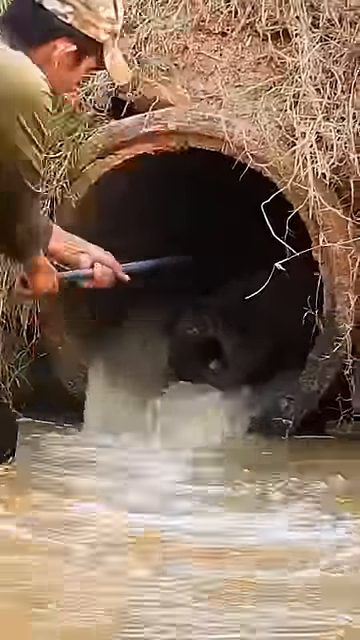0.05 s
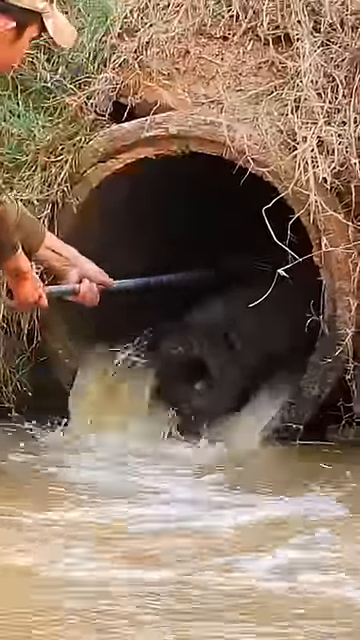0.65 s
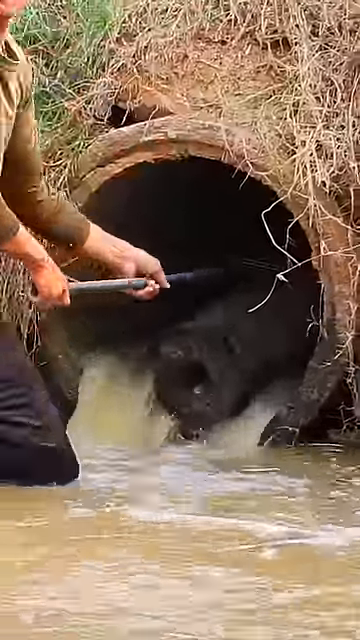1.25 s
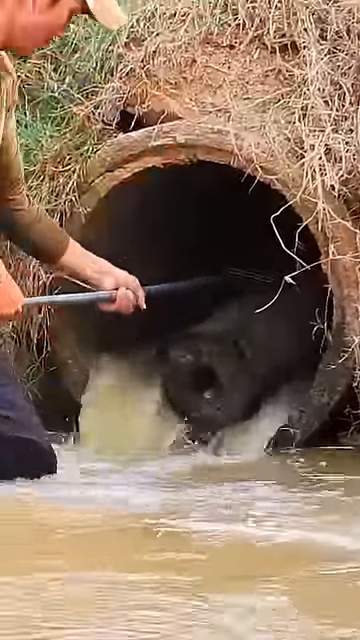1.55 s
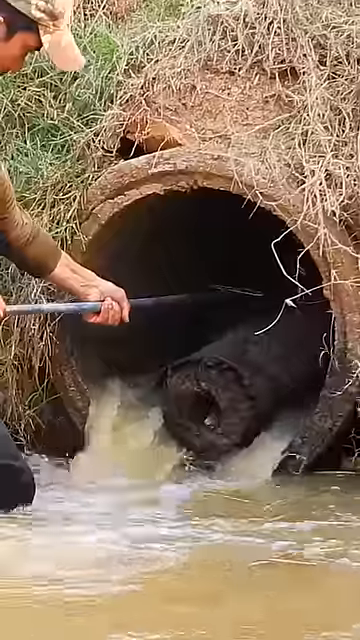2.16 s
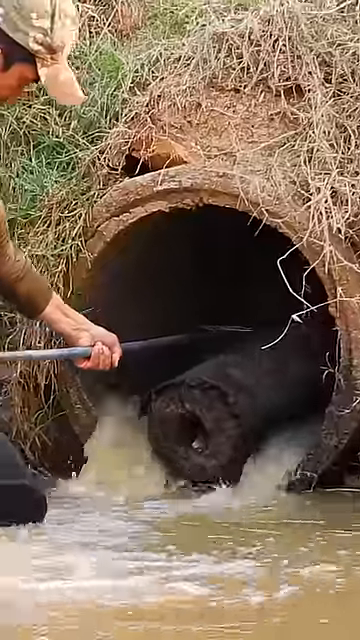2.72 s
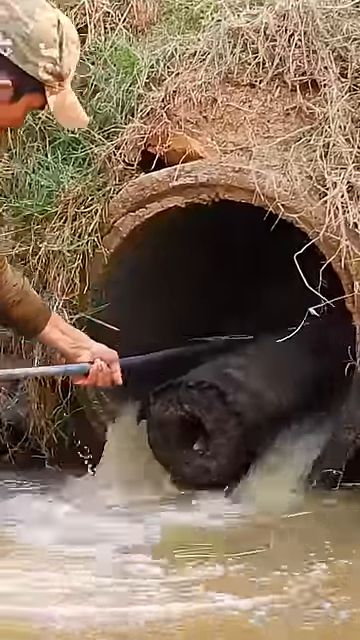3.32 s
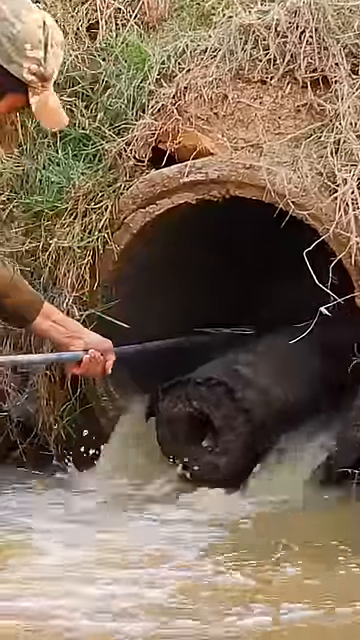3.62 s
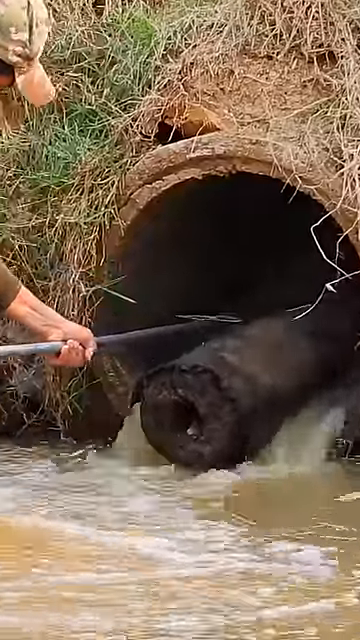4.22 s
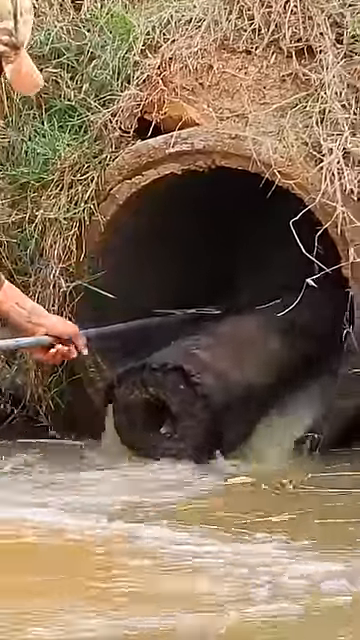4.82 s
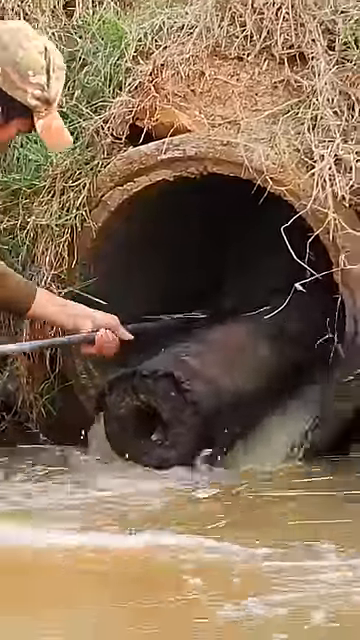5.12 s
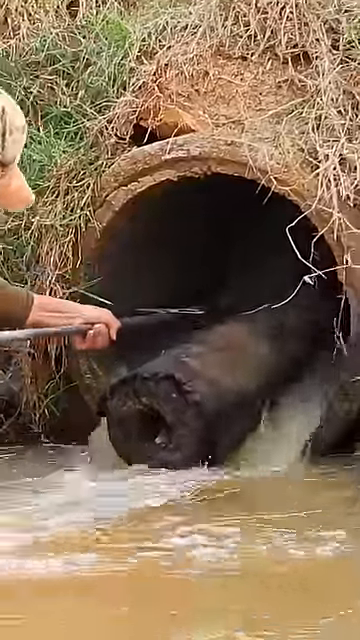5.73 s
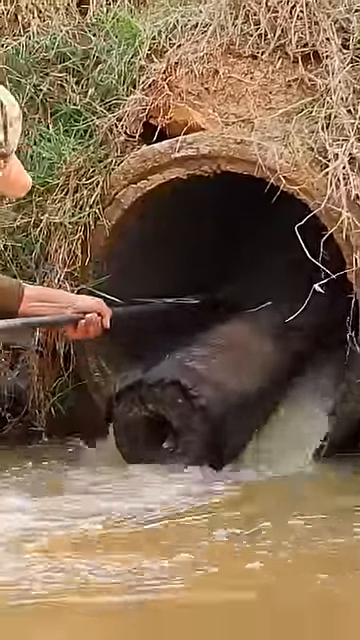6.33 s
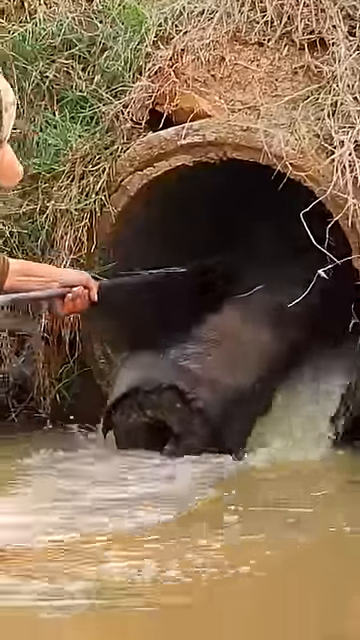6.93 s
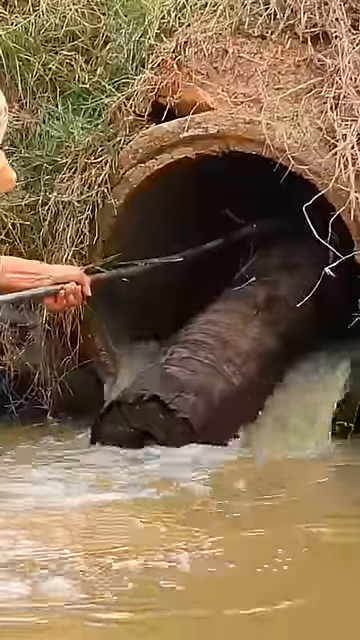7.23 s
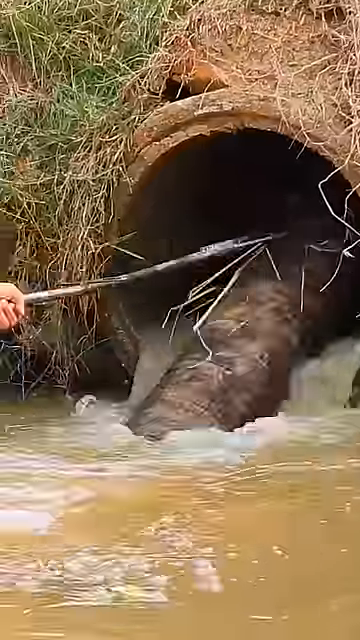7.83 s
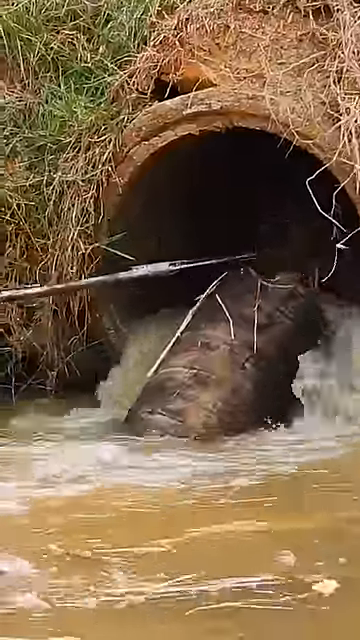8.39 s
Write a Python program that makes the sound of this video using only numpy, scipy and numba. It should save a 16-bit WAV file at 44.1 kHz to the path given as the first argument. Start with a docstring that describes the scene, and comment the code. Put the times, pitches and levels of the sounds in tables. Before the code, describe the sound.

Water pours from a concrete pipe into a canal, gurgling and splashing steadily, with scattered plops and wet slaps.

```python
"""Water pours from a concrete culvert past a log and plunges into a canal.
Outdoors, with a stereo microphone a couple of metres away: plunge in the middle, spray spread wide.
The jet drives air under and the bubbles ring; sheets of water slap the pool and fine spray crackles on top.
As the log slides out the flow shifts and the plunge grows louder and deeper."""
import sys
import numpy as np
from scipy import signal
from scipy.fft import rfft, irfft, next_fast_len
from scipy.io import wavfile
from numba import njit

SR = 44100
rng = np.random.default_rng(int(sys.argv[2]) if len(sys.argv) > 2 else 0)


def generate_wav(sig):
    """Save sig (samples, or channels by samples) to the path in sys.argv[1] as 16-bit PCM at SR."""
    pcm = np.round(np.clip(np.atleast_2d(sig).T, -1, 1) * 32767).astype(np.int16)
    wavfile.write(sys.argv[1], SR, pcm)


N = 381906
TIME = np.arange(N) / SR

# spectrum of the main gurgle: f/Hz, level/dB
PLUNGE_SPECTRUM = [(350, -44.5), (600, -18), (747, -3.5), (1000, 3.5), (1190, -2.5), (1350, 3), (1470, 4),
                   (1620, 0), (1820, -15.5), (1870, -33), (2430, -8), (4110, -120)]
# spectrum of the splashing right of the log: f/Hz, level/dB
RIGHT_JET_SPECTRUM = [(1080, -50), (1830, -21.5), (2030, -4), (2260, -5), (2600, -1), (3120, -3.5),
                      (3380, -0.5), (3700, -9), (3970, -3), (4150, -3), (4800, -9.5), (5700, -22),
                      (7410, -71), (12500, -120)]
# spectrum of the fine spray: f/Hz, level/dB
SPRAY_SPECTRUM = [(3410, -23), (5800, -16), (6460, -1.5), (6840, 1), (7850, -8.5), (8740, -6), (9450, -9),
                  (11200, -6.5), (14500, -13), (15600, -12.5)]
# spectrum of the largest bubbles: f/Hz, level/dB
GULP_SPECTRUM = [(65, -73), (110, -60), (216, -25.5), (371, -6), (460, -1.5), (620, -4), (810, -8),
                 (1360, -120)]
# the log turns the flow aside: t/s, share passing on its right/0-1
DIVERSION = [(0, 0), (2.3, 0.3), (3.5, 0.66), (6, 0.82), (8.66, 0.8)]


def pour():
    """The flow sets each bubble layer's level; the jet tumbles unevenly, so they all surge together."""
    # strength of the pour: t/s, flow/dB, extra large bubbles from a deeper plunge/dB
    flow = [(0.0, -0.5, 2), (0.55, -0.5, -2), (0.72, 0, 0.5), (0.9, -1, -1.5), (1.2, -2, 2.7),
            (1.4, -1.6, 0.5), (1.9, -1.0, -1), (2.45, -0.9, -1), (2.95, 0, 4.5), (4.1, -0.5, 0),
            (4.55, -0.9, 3), (5.1, -0.1, 1.6), (6.25, -0.64, 0.5), (6.85, 2.5, -5.5), (7.35, 1, -3.5),
            (7.85, 1.3, 3.5), (8.2, 1.5, 4), (8.66, 0.1, 4)]
    # brief swells and lulls in the water's loudness, some just before a slap: t/s, level/dB, half length/s
    swells_and_lulls = [(0.1, -1.5, 0.03), (0.495, -1, 0.022), (0.562, 3, 0.036), (0.788, -4, 0.02),
                        (3.167, 0.5, 0.034), (4.34, 0.5, 0.031), (4.742, -3.5, 0.011), (7.038, -3.5, 0.016),
                        (7.36, -1.5, 0.033), (7.482, 0.5, 0.05), (7.57, -1, 0.022), (7.714, -4.5, 0.018),
                        (7.814, -4.5, 0.035), (8.183, 1.5, 0.03), (8.485, 1.5, 0.073)]
    # the largest bubbles at the usual flow: t/s, level/dB
    gulp_levels = [(0, -57.5), (1.2, -56), (2.3, -56), (2.8, -53), (4.3, -55), (5.4, -52), (6.4, -55),
                   (7.35, -54.5), (7.5, -51), (8.66, -50)]
    flow_db, depth_db = curves(flow)
    level_db = flow_db + sum(db * np.exp(-((TIME - s) / half_s) ** 2) for s, db, half_s in swells_and_lulls)
    right_share, = curves(DIVERSION)
    surge = 0.6 * walk(12) + 0.25 * walk(33) + 1.1 * walk(110)
    spatter = splats(spread_db=5.0, decay_s=0.0053, count=2200)
    gulp_gain = undb(curves(gulp_levels)[0] + 0.5 * level_db)
    plunge_gain = undb(-32.5 + 0.97 * level_db + 2.5 * right_share)
    splash_gain = undb(-31.5 + 0.8 * level_db - 0.13 * right_share)
    spray_gain = undb(-39 + 0.99 * level_db + 1.1 * right_share)
    return (gulping(surge) * gulp_gain
            + culvert(plunging(surge, spatter, depth_db)) * plunge_gain
            + splashing(surge, spatter) * splash_gain
            + spraying(surge, spatter) * spray_gain)


def plunging(surge, spatter, depth_db):
    """The main gurgle of air driven under; a deeper jet makes more of the large, low bubbles."""
    flutter = undb(surge) * speckle(spatter, share=0.12)
    gurgle = bubbles(PLUNGE_SPECTRUM, flutter, cycles=25.06, spread_db=5.0, froth_db=-1.0,
                     glide=0.082, count=7000)
    large = shade(gurgle, [(880, 1.0), (1200, -16)])
    depth_gain = undb(1.02 * (depth_db - depth_db.mean()))
    return unit(gurgle + large * (depth_gain - 1))


def culvert(water, reach=0.16):
    """The pipe's mouth rings at two hollow notes, each coming and going as the log and jets shift."""
    # resonances of the mouth: f/Hz
    pipe_hz = [1023, 1420]
    # how strongly they ring: t/s, lower note/dB, upper note/dB
    pipe_gains = [(0, 2.5, 2), (1.0, 0, 1), (2.2, -3, 1), (3.2, 1, 0.5), (4.2, 5.5, 0), (5.1, 5, 2.5),
                  (6.3, 5, -2), (7.0, -2.5, 3), (7.8, -6, 0.5), (8.66, 0.5, 1.5)]
    notes = (shade(water, [(hz * (1 - reach), -24), (hz, 0), (hz * (1 + reach), -24)]) for hz in pipe_hz)
    return water + sum(note * (undb(db) - 1) for note, db in zip(notes, curves(pipe_gains)))


def splashing(surge, spatter):
    """Two jets share the flow around the log, each splashing with its own colour."""
    # spectrum of the splashing left of the log: f/Hz, level/dB
    left_jet_spectrum = [(1100, -40), (1870, -9.5), (2020, -10), (2100, -3), (2240, 1.5), (2470, -5),
                         (3030, -2.5), (3700, -8.5), (3920, -7), (4290, -7.5), (4900, -12.5), (5850, -23.5),
                         (7600, -62), (12900, -120)]
    right_share, = curves(DIVERSION)
    flutter = undb(0.48 * surge) * speckle(spatter, share=0.29)
    left, right = (bubbles(jet, flutter, cycles=46, spread_db=5.5, froth_db=2.5, glide=0.058, count=6000)
                   for jet in (left_jet_spectrum, RIGHT_JET_SPECTRUM))
    return np.sqrt(1 - right_share) * left + np.sqrt(right_share) * right


def spraying(surge, spatter):
    """Fine spray hisses and crackles as it lands; its coarser fizz comes in spurts."""
    crackle = splats(spread_db=3.5, decay_s=0.001, count=1600)
    flutter = undb(0.64 * surge) * speckle(spatter, share=0.15) * speckle(crackle, share=0.19)
    mist = bubbles(SPRAY_SPECTRUM, flutter, cycles=99, spread_db=6.0, froth_db=8.5,
                   glide=0.025, count=4000)
    fizz = shade(mist, [(5800, -20), (6500, -0.5), (7200, -2), (8200, -23)])
    spurts = undb(1.3 * walk(22))
    return unit(mist + fizz * (spurts - 1))


def slaps():
    """A sheet of water hits the pool: a short, bright crash, with a hollow body if it traps air."""
    # sheets landing: t/s, level/dB, decay/s, extra level of the body/dB
    sheets = [(0.431, -21.5, 0.0054, 4.5), (0.545, -26, 0.013, 2), (0.808, -20, 0.006, 0),
              (1.685, -22.5, 0.009, -4), (1.976, -19, 0.006, -3), (2.048, -20, 0.007, -8),
              (2.217, -21, 0.006, 3.5), (2.307, -15.5, 0.01, -6), (2.973, -21, 0.0055, 8.5),
              (3.725, -21, 0.0067, 3), (4.002, -23, 0.0045, 5), (4.755, -17, 0.0075, 2.5),
              (4.816, -19, 0.005, -4), (4.893, -14, 0.006, -11), (6.079, -11, 0.006, -12),
              (6.967, -19, 0.005, -2), (7.053, -15, 0.01, -1), (7.222, -25, 0.021, 6.5),
              (7.372, -14, 0.007, -10), (7.468, -17.5, 0.012, 1.5), (7.52, -16.5, 0.013, -3.5),
              (7.666, -18, 0.007, -2), (7.757, -17.5, 0.009, -4), (7.854, -21, 0.004, 5),
              (8.004, -21.5, 0.0075, 6.5), (8.025, -17, 0.007, -7), (8.083, -16.5, 0.006, -1),
              (8.153, -16.5, 0.028, -4), (8.206, -17, 0.009, -1), (8.25, -23, 0.022, 3.5),
              (8.425, -15, 0.014, -9)]
    crash = stereo_noise() * sum(undb(db) * burst(s, decay_s) for s, db, decay_s, _ in sheets)
    body = stereo_noise() * sum(undb(db + extra) * burst(s, decay_s) for s, db, decay_s, extra in sheets)
    return (undb(3.5) * colour(crash, RIGHT_JET_SPECTRUM)
            + undb(7.5) * colour(body, PLUNGE_SPECTRUM)
            + undb(-7.0) * colour(crash, SPRAY_SPECTRUM))


def plops():
    """Bubbles near the microphone well up and ring out; the smaller ones ring for more cycles."""
    # the loudest single bubbles, above the churn: t/s, level/dB, f/Hz
    near_bubbles = [(0.25, -21.5, 1010), (0.318, -19.5, 1450), (0.548, -20.5, 1000), (0.584, -19, 1400),
                    (1.006, -19, 1290), (1.688, -17, 2170), (1.896, -20, 1297), (2.22, -14, 1517),
                    (2.399, -19, 1480), (2.742, -18, 1280), (2.757, -14, 1254), (2.954, -14, 1005),
                    (3.025, -16, 1070), (3.461, -14, 976), (3.502, -14, 933), (3.695, -19, 846),
                    (3.757, -18.5, 1390), (3.865, -20, 1320), (4.134, -16, 1020), (4.794, -13.5, 1014),
                    (5.057, -13.5, 3340), (5.207, -16.5, 1015), (5.592, -15.5, 1350), (6.266, -14.5, 1000),
                    (6.354, -18.5, 980), (6.988, -12.5, 1270), (7.474, -17, 1403), (7.643, -14.5, 1433),
                    (8.155, -12.5, 2620), (8.25, -14.5, 744)]
    s, db, hz = np.array(near_bubbles, float).T.copy()
    cycles = 30 * np.sqrt(hz / 1000)
    pan = rng.uniform(-0.86, 1, len(s))
    notes = ring(s, hz, undb(db), cycles, pan, glide=0.054, swell=0.266)
    return shade(notes, [(100, -45), (350, -1)])


def drops():
    """A drop lands near the microphone, ticks on the surface and scatters a little mist."""
    # drops landing: t/s, tick level/dB, f/Hz, mist level/dB, mist decay/s
    landings = [(0.545, -22, 10500, -32, 0.028), (0.706, -14, 6500, -31, 0.008),
                (3.0945, -5, 10100, -18.5, 0.008), (3.462, -23, 11000, -24, 0.004),
                (3.498, -18, 7400, -22, 0.005), (4.0527, -17, 9400, -28, 0.003),
                (4.846, -14, 7030, -30, 0.006), (5.286, -10, 7000, -31, 0.008),
                (5.431, -16, 11400, -25, 0.005), (6.231, -13, 6750, -27, 0.005),
                (7.128, -17, 10500, -22, 0.009), (7.736, -16, 11500, -20, 0.004),
                (8.4966, -15, 7200, -23, 0.003)]
    s, db, hz = np.array(landings, float).T[:3].copy()
    pan = rng.uniform(-1, 1, len(s))
    ticks = ring(s, hz, undb(db), cycles=np.full(len(s), 20.), pan=pan, glide=0.088, swell=0.053)
    mist = stereo_noise() * sum(undb(level) * burst(t, decay_s) for t, _, _, level, decay_s in landings)
    return colour(ticks + mist, [(2000, -35), (6000, -5), (7000, -2.5), (10000, -2), (13000, -2),
                                 (16000, -8)])


def glugs(decay_s=0.017, lead_s=0.0084):
    """A large pocket of air collapses: one low note inside a hollow rush."""
    # air pockets: t/s, level/dB, f/Hz
    pockets = [(1.346, -34.5, 550), (1.626, -40, 535), (2.18, -42, 540), (2.882, -34, 417),
               (3.931, -37, 470), (5.121, -36, 520), (7.755, -37, 440), (7.866, -36, 460)]
    s, db, hz = np.array(pockets, float).T.copy()
    centre = np.zeros(len(s))
    notes = ring(s, hz, undb(db), cycles=np.full(len(s), 17.), pan=centre, glide=0.08, swell=0.25)
    rush = stereo_noise() * sum(undb(level) * burst(t - lead_s, decay_s) for t, level, _ in pockets)
    return shade(notes, [(100, -45), (350, -1)]) + undb(13.0) * colour(rush, GULP_SPECTRUM)


def gulping(surge):
    """The largest bubbles ring low and briefly, soft beneath the gurgle."""
    flutter = undb(1.04 * surge + 0.93 * walk(25))
    return bubbles(GULP_SPECTRUM, flutter, cycles=10.77, spread_db=4.0, froth_db=-2.5,
                   glide=0.057, count=3200)


def rumble():
    """A very faint, unsteady rumble behind the water, swelling as the log slides out."""
    # course of the rumble: t/s, level/dB
    rumble_levels = [(0, -85.5), (8.0, -87), (8.4, -76), (8.66, -77)]
    db, = curves(rumble_levels)
    low = colour(stereo_noise(), [(20, -2.0), (100, -5.0), (200, 0.5), (600, -29)])
    return unit(low) * undb(db + 2.9 * walk(24))


def bubbles(spectrum, flutter, cycles, spread_db, froth_db, glide, count):
    """A cloud of bubbles of one class of size, over the froth of those too faint to tell apart."""
    when, pitch, life, place = rng.random((count, 4)).T
    loudness = np.clip(rng.standard_normal(count), -3, 1.7)
    low_hz, high_hz = spectrum[1][0] * .8, spectrum[-2][0] * 1.05
    hz = low_hz * (high_hz / low_hz) ** pitch
    # small bubbles die sooner, so they need more swing to carry the same share
    amplitude = hz * undb(spread_db * loudness)
    cloud = ring(when * N / SR, hz, amplitude, cycles * (.5 + life), 2 * place - 1, glide, swell=0.25)
    froth = shade(stereo_noise(), [(high_hz, 0), (2 * high_hz, -40)])
    churn = unit(cloud) + undb(froth_db) * unit(froth)
    return unit(colour(flutter * churn, spectrum))


@njit
def ring(onset_s, hz, amplitude, cycles, pan, glide, swell):
    """Bubbles as (mid, side): rising sines that swell for a share of their life and end in `cycles`."""
    out = np.zeros((2, N))
    for k in range(len(onset_s)):
        length, phase = int(cycles[k] * SR / hz[k]), 0.
        first = int(onset_s[k] * SR - swell * length / 2)
        for i in range(max(0, -first), min(length, N - first)):
            age = i / length
            phase += 2 * np.pi * hz[k] * (1 + glide * age) / SR
            attack = 1 - np.exp(-(age / swell) ** 2)
            decay = np.exp(-6.9 * (age - swell)) * (1 - age ** 4)
            pressure = amplitude[k] * attack * decay * np.sin(phase)
            out[0, first + i] += pressure
            out[1, first + i] += pan[k] * pressure
    return out


def splats(spread_db, decay_s, count):
    """Power over time of many small splats, each jumping up and dying away; mean 1."""
    onsets = (rng.random(count) * N).astype(int)
    loudness = np.minimum(rng.exponential(size=count), 3.4)
    hits = np.bincount(onsets, undb(spread_db * loudness) ** 2, N)
    power = signal.lfilter([1], [1, -np.exp(-1 / (decay_s * SR))], hits)
    return power / power.mean()


def speckle(power, share):
    """A gain that gives a share of a steady sound's power to the splats."""
    return np.sqrt(1 - share + share * power)


def burst(s, decay_s, rise_s=0.00074):
    """An envelope that rises quickly at time s and dies away."""
    first = max(int(s * SR), 0)
    age = TIME[:min(SR // 10, N - first)]
    envelope = np.zeros(N)
    envelope[first:first + len(age)] = (1 - np.exp(-age / rise_s)) * np.exp(-age / decay_s)
    return envelope


def walk(rate):
    """A random wander with about `rate` turns a second and a spread near 1."""
    knots = rng.standard_normal(4096)
    return np.sqrt(1.5) * np.interp(TIME * rate, np.arange(len(knots)), knots)


def stereo_noise():
    """Independent white noise for mid and side."""
    return rng.standard_normal((2, N))


def undb(db):
    """Decibels to gain."""
    return 10 ** (np.asarray(db) / 20)


def unit(x):
    """Scale mid and side each to rms 1."""
    return x / np.sqrt(np.mean(x ** 2, axis=-1, keepdims=True))


def curves(table):
    """The columns of a table, joined by straight lines in time."""
    s, *columns = np.transpose(table)
    return [np.interp(TIME, s, column) for column in columns]


def bin_gains(points, size):
    """An (f/Hz, level/dB) table as gains for the size + 1 bins of a transform."""
    hz, db = np.transpose(sorted(points))
    bin_hz = np.linspace(0, SR / 2, size + 1)
    return undb(np.interp(np.log(bin_hz + 1), np.log(hz), db))


def shade(x, points):
    """Weight the spectrum by (f/Hz, level/dB) points and leave the phase alone."""
    size = next_fast_len(N)
    return irfft(rfft(x, 2 * size) * bin_gains(points, size))[..., :N]


def colour(x, points, size=2048):
    """Causal filter with the given spectrum, so attacks stay sharp; falls away below the first point."""
    low_hz, low_db = points[0]
    skirt = [(low_hz / 2, low_db - 30)]
    cepstrum = irfft(np.log(bin_gains(skirt + list(points), size)))[:size]
    cepstrum[1:] *= 2  # minimum phase
    response = irfft(np.exp(rfft(cepstrum, 2 * size)))[:size]
    return signal.oaconvolve(x, response[None], axes=1)[:, :N]


def scene():
    """At the microphone the plunge sits in the middle and the spray spreads wide."""
    # stereo width of the pour: f/Hz, side gain/dB
    width = [(100, -7), (380, -13), (700, -7.5), (1000, -29.5), (1450, -27.5), (1850, -7.5), (2400, -19.5),
             (3200, -10.5), (4400, -9), (5700, 0.5), (6800, -10), (8500, -7), (15000, -2)]
    # lean of the pour: f/Hz, left minus right/dB
    lean = [(150, -2), (380, 2), (1000, 1), (1700, -1), (2400, 1), (3300, -4), (4400, 5), (6500, 1.5),
            (14000, -1)]
    mid, side = pour() + plops() + glugs() + slaps() + drops() + rumble()
    side = shade(side, width)
    left = shade(mid + side, [(hz, db / 2) for hz, db in lean])
    right = shade(mid - side, [(hz, -db / 2) for hz, db in lean])
    return np.array([left, right])


def record(dry):
    """The recorder cuts the top steeply."""
    top_hz = 15800
    return signal.sosfilt(signal.ellip(12, .1, 80, top_hz, fs=SR, output="sos"), dry)


dry = scene()
out = record(dry)
generate_wav(out)
```